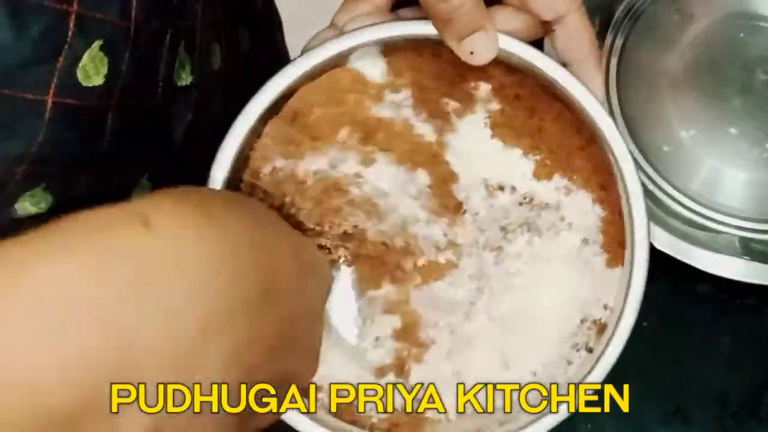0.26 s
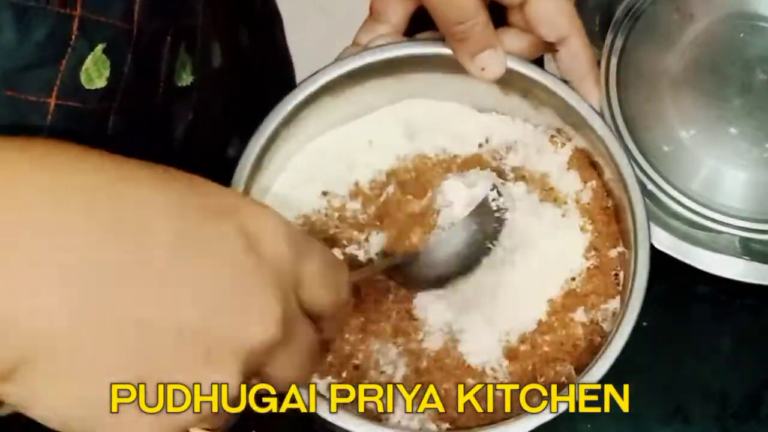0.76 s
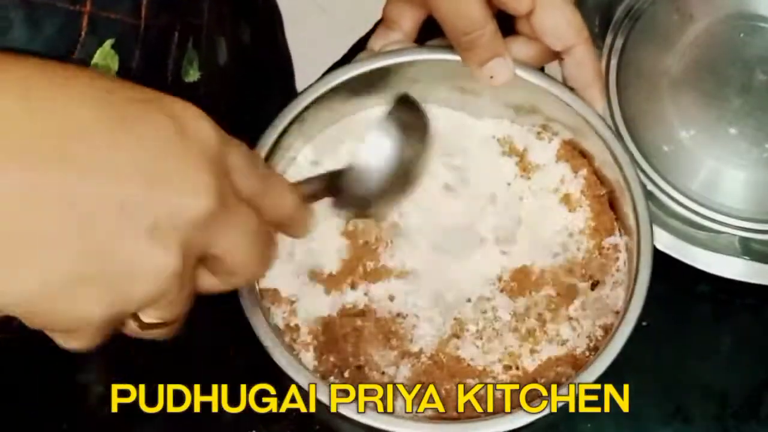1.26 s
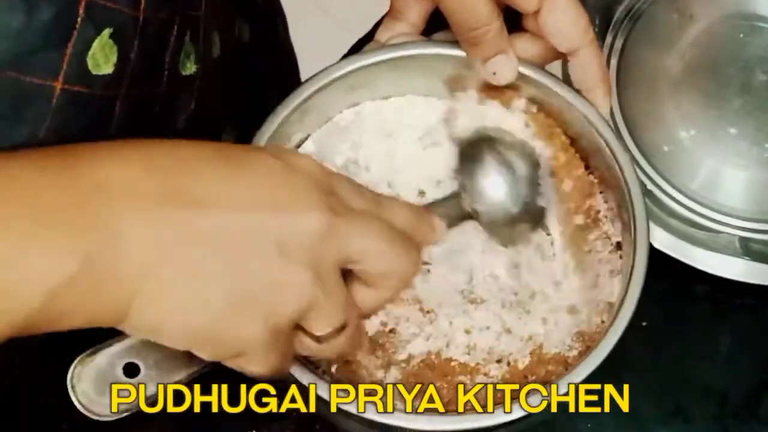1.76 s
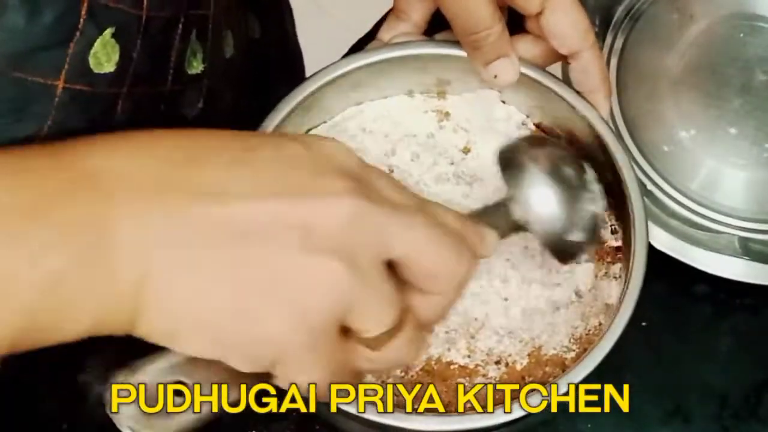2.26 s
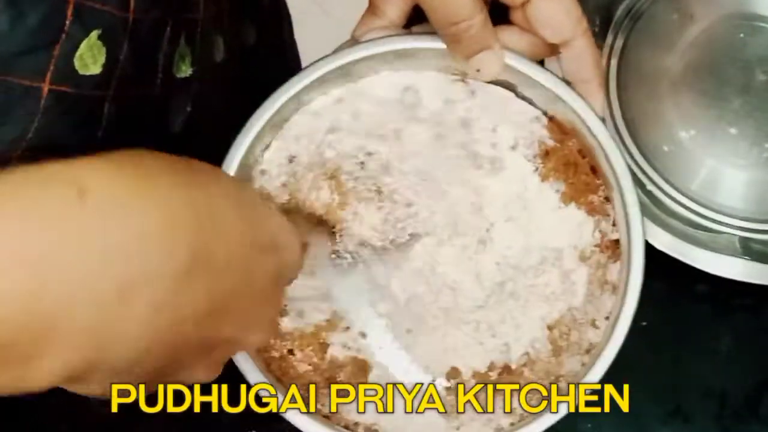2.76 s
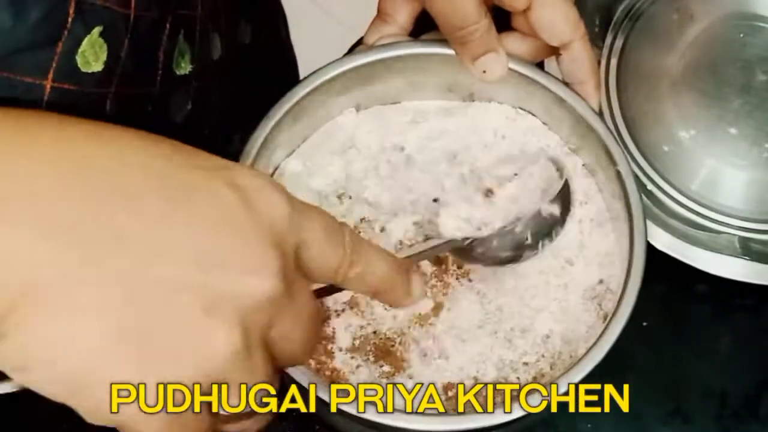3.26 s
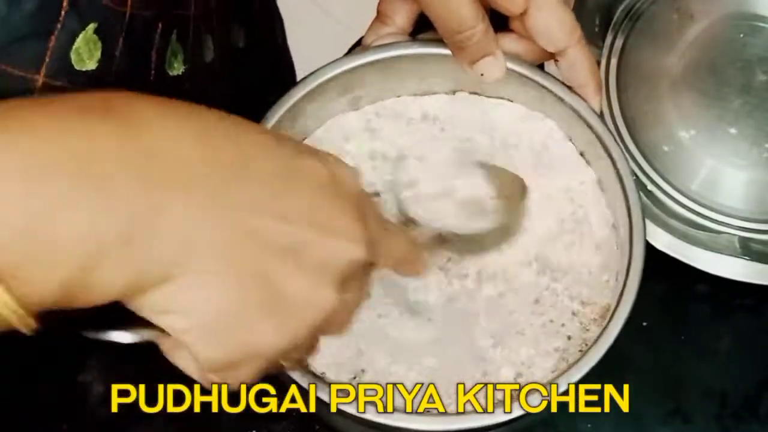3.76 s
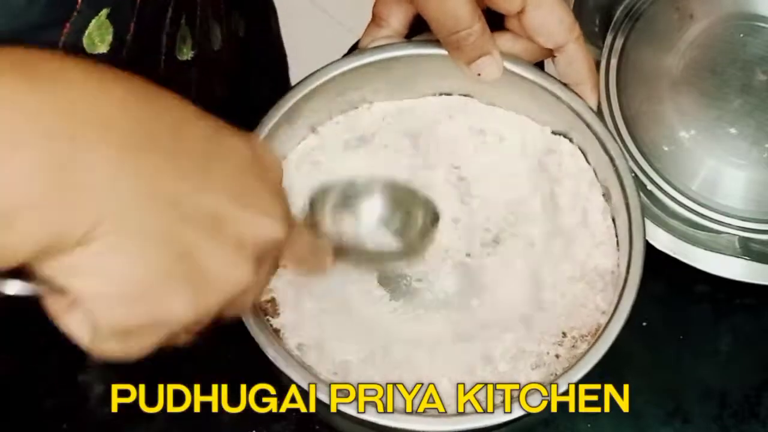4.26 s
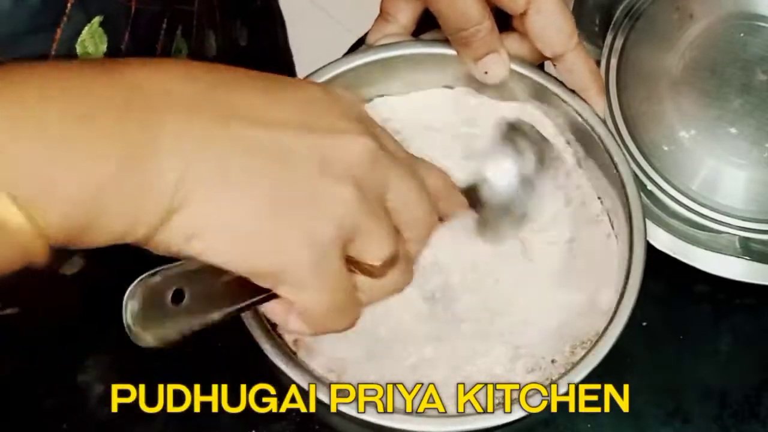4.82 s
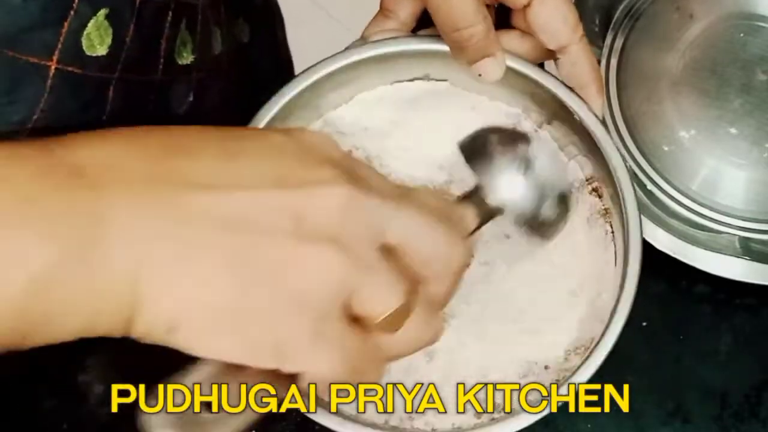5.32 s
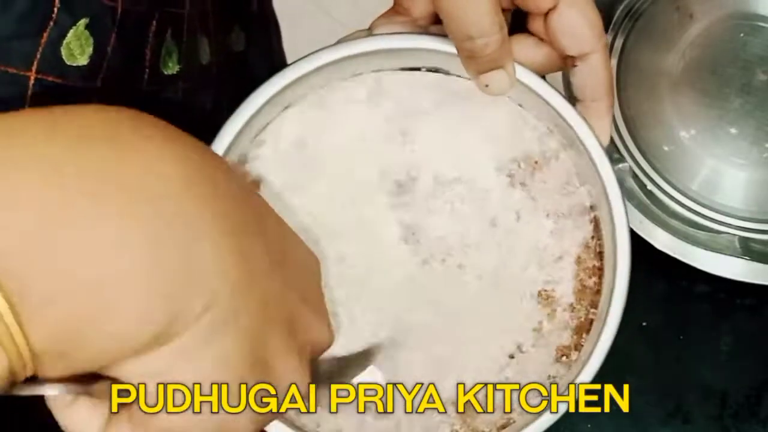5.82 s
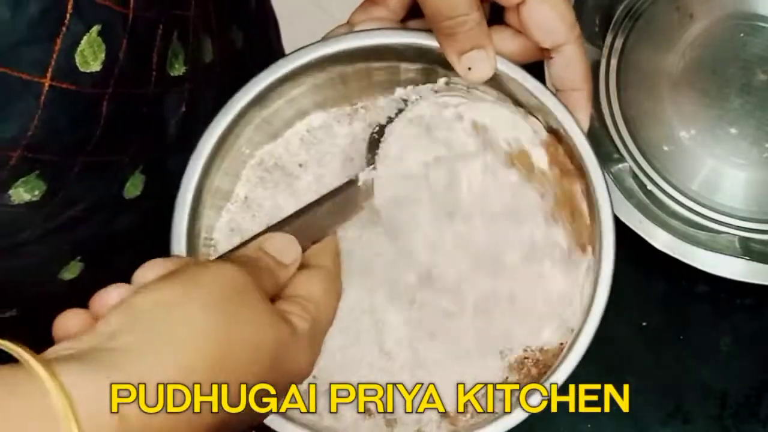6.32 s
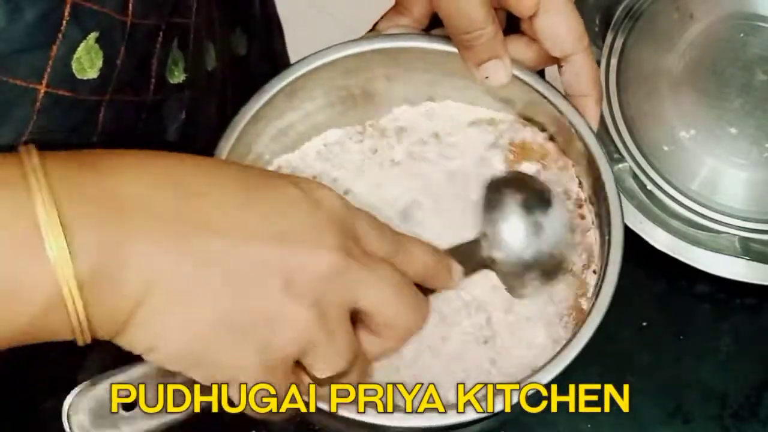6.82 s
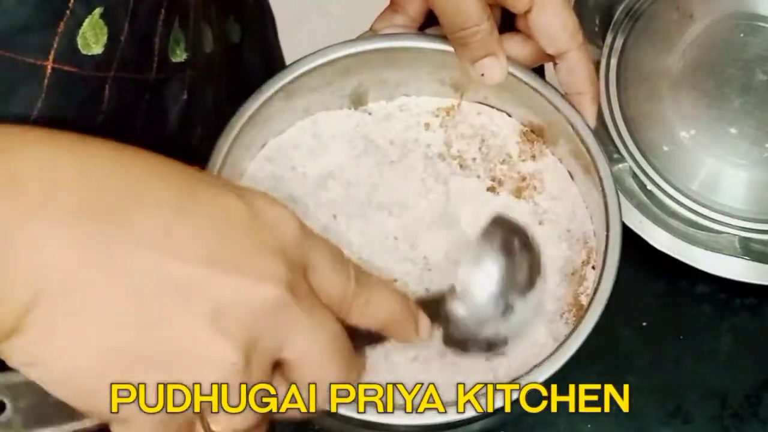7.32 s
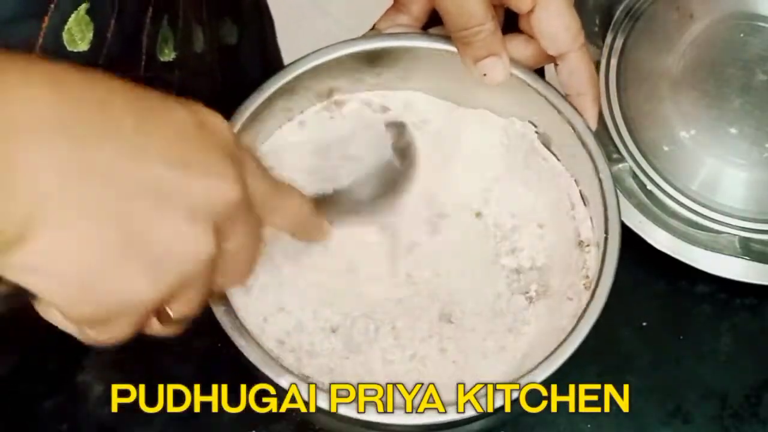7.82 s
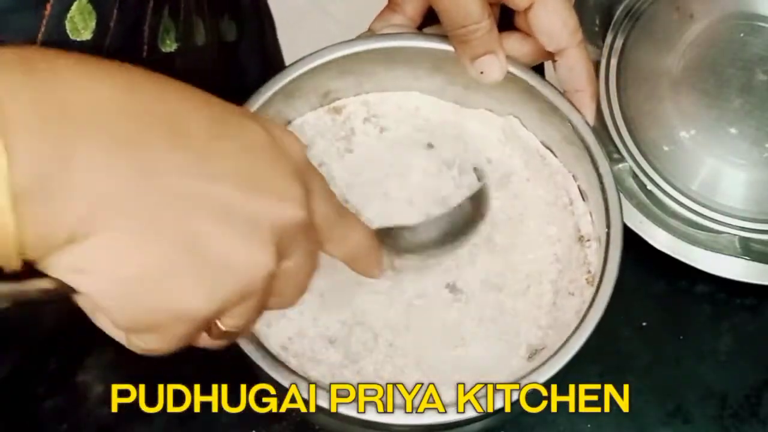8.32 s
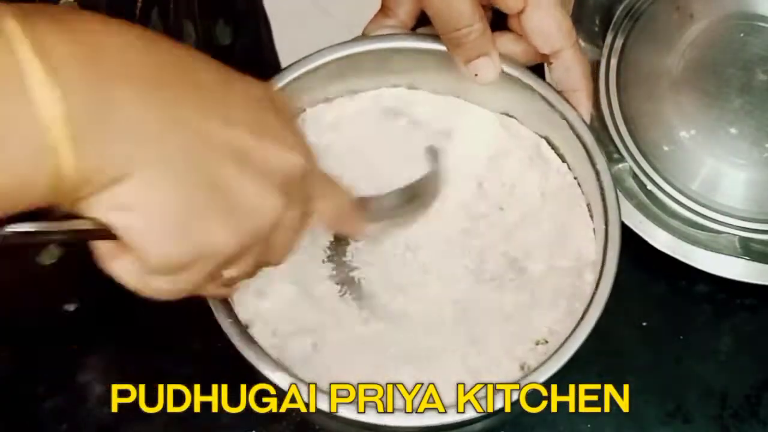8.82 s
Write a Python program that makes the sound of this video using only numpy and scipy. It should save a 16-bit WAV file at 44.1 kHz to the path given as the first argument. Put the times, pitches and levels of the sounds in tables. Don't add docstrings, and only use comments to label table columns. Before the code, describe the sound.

Close-up dry stirring in a steel pot: grainy scrapes, muffled taps, short bright knocks and dull counter thuds above a low motor hum.

```python
import sys
import numpy as np
from scipy import signal
from scipy.fft import rfft, irfft, next_fast_len
from scipy.io import wavfile
from scipy.ndimage import uniform_filter1d, map_coordinates

SR = 44100
rng = np.random.default_rng(int(sys.argv[2]) if len(sys.argv) > 2 else 0)


def persist_wave(psi):
    counts = np.round(np.clip(psi, -1, 1) * 32767).astype(np.int16)
    wavfile.write(sys.argv[1], SR, np.atleast_2d(counts).T)


def attenuation_scalar(level_db):
    decades = np.asarray(level_db, float) / 20
    return 10 ** decades


N = 400428

# f/Hz, level/dB, t60/s
STEEL_MODES = [(209, -6.5, 0.04), (433.6, -2, 0.087), (561.4, -6, 0.13), (754, -1.5, 0.057),
               (960, -7.5, 0.073), (1276, -16, 0.062), (1688, -13, 0.055), (2050, -2, 0.045),
               (2240, -8.5, 0.017), (2620, -11.5, 0.15), (2735, -8, 0.05), (3060, 2.5, 0.021),
               (3266, -3.5, 0.072), (3555, -10.5, 0.086), (4660, -12, 0.023), (4800, 1.5, 0.027),
               (5046, 1, 0.021), (5490, -8.5, 0.055), (6140, -13.5, 0.069), (6530, -5.5, 0.053),
               (6586, -1, 0.05), (6880, -16, 0.064), (7060, -6, 0.069)]
# f/Hz, density/dB per Hz
ROCK_SPECTRUM = [(120, -26), (200, 3), (450, 3.5), (750, 1), (1100, -18.5), (2000, -68.5)]


def unit(x):
    return x / np.sqrt(np.mean(x ** 2) + 1e-20)


def along(points, hz):
    f, v = np.transpose(points)
    return np.interp(np.log(hz + 1), np.log(f + 1), v)


def curve(points):
    s, v = np.transpose(points)
    return np.interp(np.arange(N) / SR, s, v)


def wobble(rate_hz):
    knots = rng.standard_normal(int(N * rate_hz / SR) + 4)
    return map_coordinates(knots, [np.arange(N) * rate_hz / SR])


def held(start_s, hold_s, level_db, rise_db_per_s, fall_db_per_s, rest_db):
    t = np.arange(0, N + 64, 64) / SR
    early_s = np.maximum(start_s[:, None] - t, 0)
    late_s = np.maximum(t - (start_s + hold_s)[:, None], 0)
    off_db = rise_db_per_s * early_s + fall_db_per_s * late_s
    power = np.sum(attenuation_scalar(level_db[:, None] - off_db) ** 2, axis=0)
    return np.sqrt(np.interp(np.arange(N) / SR, t, power) + attenuation_scalar(rest_db) ** 2)


def filtered(x, response):
    n = x.shape[-1]
    m = next_fast_len(n + 4096)
    return irfft(rfft(x, m) * response(np.fft.rfftfreq(m, 1 / SR)), m)[..., :n]


def spread(pair):
    # f/Hz, left-right correlation [-]
    likeness = [(60, 0.97), (130, 1), (290, 0.74), (640, 0.55), (1400, 0), (3100, 0.047), (6800, 0.84),
                (15000, 0.13)]

    def mid_side(hz):
        turn = np.arccos(np.clip(along(likeness, hz), -1, 1)) / 2
        return np.array([np.cos(turn), np.sin(turn)])

    mid, side = filtered(pair, mid_side)
    return np.array([mid + side, mid - side])


def rush(spectrum, patchy_db):
    z = signal.stft(rng.standard_normal((2, N)), nperseg=512)[2]
    field = uniform_filter1d(rng.standard_normal(z.shape[1:]), size=6, axis=0)
    field = uniform_filter1d(field, size=12, axis=1)
    pair = signal.istft(z * attenuation_scalar(patchy_db * unit(field)), nperseg=512)[1][:, :N]
    return unit(spread(filtered(pair, lambda hz: attenuation_scalar(along(spectrum, hz)))))


def kitchen(x, wet_db, lag_s):
    # f/Hz, t60/s
    wall_decay = [(200, 0.76), (530, 0.63), (1400, 0.63), (3700, 0.43), (9700, 0.41)]
    hz, t, z = signal.stft(rng.standard_normal((2, SR * 3 // 4)), SR, nperseg=256)
    decay = attenuation_scalar(-60 * t / along(wall_decay, hz)[:, None])
    tail = spread(signal.istft(z * decay, SR, nperseg=256)[1])
    tail_s = np.arange(tail.shape[1]) / SR
    tail *= 1 - np.exp(-tail_s / 0.0011)
    tail *= 1 + 1.03 * np.exp(-tail_s / 0.011)
    tail *= attenuation_scalar(wet_db) / np.linalg.norm(tail[1])
    tail[0, round(lag_s * SR)] += 1
    tail[1, 0] += 1
    return signal.fftconvolve(x[None], tail, axes=1)


def add_at(out, start_s, heard):
    out[:, round(start_s * SR):][:, :heard.shape[1]] += heard


def motor_hum():
    # f/Hz, density/dB per Hz
    hum_spectrum = [(44, -48), (75, -1.5), (102, 5), (113, 11.5), (127, 10), (145, -1.5), (178, -3.5),
                    (210, -6.5), (260, -24), (340, -42.5), (570, -120)]
    # t/s, level/dB
    steady = [(0, -48.5), (2.5, -48.5), (4.9, -52), (5.3, -55.5), (7.4, -53.5), (9.08, -50)]
    # start/s, length/s, level/dB
    surges = [(0.119, 0.38, -44.5), (0.59, 0.028, -48), (0.772, 0.042, -46.5), (0.913, 0.21, -43.5),
              (1.33, 0.097, -43.5), (1.665, 0.54, -43), (2.408, 0.13, -46), (2.61, 0.078, -45),
              (2.73, 0.12, -45.5), (2.958, 0.04, -46), (3.074, 0.04, -47), (3.29, 0.074, -49.5),
              (3.639, 0.032, -43), (3.768, 0.04, -47), (4.038, 0.094, -46.5), (4.387, 0.03, -45),
              (4.551, 0.063, -45), (4.775, 0.037, -49), (6.034, 0.067, -44), (6.49, 0.072, -44.5),
              (7.582, 0.083, -47), (7.825, 0.049, -43.5), (8.792, 0.041, -44), (9.019, 0.042, -46)]
    gain = held(*np.transpose(surges), rise_db_per_s=301, fall_db_per_s=250, rest_db=curve(steady))
    return attenuation_scalar(2.5) * gain * rush(hum_spectrum, patchy_db=1.5)


def lowest_hum():
    # t/s, level/dB
    deep_level = [(0.0, -63), (0.3, -53), (1.16, -65), (1.24, -83), (1.31, -59), (1.95, -63), (2.02, -78),
                  (2.25, -58), (3.24, -53), (3.51, -66), (4.27, -49.5), (7.16, -61.5), (7.23, -79),
                  (7.69, -58), (8.02, -68), (9.08, -65)]
    tone = np.sin(2 * np.pi * np.cumsum(64 + 1.5 * wobble(3)) / SR)
    tone = unit(tone * attenuation_scalar(1.5 * wobble(4)))
    rumble_spectrum = [(20, -1), (35, -3), (50, -14), (80, -13), (100, -30.5), (200, -120)]  # f/Hz, dB per Hz
    rumble = attenuation_scalar(-54 + 3 * wobble(1.56)) * rush(rumble_spectrum, patchy_db=0)
    return attenuation_scalar(curve(deep_level) + 3.5) * tone + rumble


def far_hiss():
    # f/Hz, density/dB per Hz
    hiss_spectrum = [(120, -26), (200, -21.5), (307, -2.5), (572, -18), (787, -6.5), (968, -11.5),
                     (1370, -5), (1800, -11), (1980, -8), (2480, 0.5), (2810, -24), (6440, -33),
                     (9000, -66), (11700, -78), (19800, -120)]
    # t/s, level/dB
    hiss_level = [(0, -35), (.4, -58), (1.15, -44), (1.9, -39), (2.3, -39), (2.5, -44.5), (2.95, -30),
                  (3.6, -63), (4.2, -35.5), (4.7, -43), (5.3, -63), (5.65, -37.5), (6.05, -39.5),
                  (6.5, -64), (7.45, -56), (7.95, -57), (8.3, -40), (9.08, -61)]
    # f/Hz, density/dB per Hz
    air_spectrum = [(100, 0.5), (2000, -4), (7000, -3), (8200, -46.5), (12000, -120)]
    hiss = attenuation_scalar(curve(hiss_level) - 10.5) * rush(hiss_spectrum, patchy_db=0.5)
    return hiss + attenuation_scalar(-68) * rush(air_spectrum, patchy_db=-2.0)


def scrape():
    # full pressure from t/s, held/s, scrape/dB, rocking/dB
    strokes = [(.17, 0.092, -62, -63), (.3, .04, -52.5, -54), (.38, 0.057, -43, -44),
               (0.681, 0.042, -43, -54), (0.962, 0.17, -46.5, -43.5), (1.3, 0.11, -49.5, -41),
               (1.47, .05, -49.5, -62), (1.631, 0.19, -42.5, -46), (1.83, 0.1, -37.5, -49),
               (2.02, 0.14, -49.5, -50), (2.36, 0.089, -59.5, -54), (2.56, 0.032, -58.5, -53),
               (2.768, .13, -42.5, -47), (2.97, .22, -45, -47), (3.25, 0.19, -42, -50),
               (3.5, 0.25, -45, -49.5), (3.962, 0.092, -36, -39.5), (4.08, 0.11, -42, -44.5),
               (4.55, 0.09, -46.5, -39), (4.85, .2, -45, -50), (5.15, 0.39, -49.5, -56.5),
               (6.17, 0.056, -37.5, -40), (6.46, 0.094, -42.5, -63), (6.829, 0.089, -44.5, -53),
               (7.202, 0.066, -43, -49.5), (7.501, 0.087, -50, -56), (7.84, 0.11, -42, -48),
               (8.01, .26, -46, -54), (8.33, 0.35, -46.5, -48.5), (8.7, 0.35, -47.5, -51.5)]
    # f/Hz, density/dB per Hz
    grit_spectrum = [(180, -8), (300, -8), (440, -31), (614, -6), (1170, 1), (2280, 7.5), (3700, -1.5),
                     (4910, -1.5), (5430, -2), (6620, 0.5), (8090, -16), (15000, -26.5), (16000, -11)]
    start_s, hold_s, scrape_db, rock_db = np.transpose(strokes)
    dig_db_per_s, lift_db_per_s = 238, 174
    press = held(start_s, hold_s, scrape_db, dig_db_per_s, lift_db_per_s, rest_db=-64.5)
    rock = held(start_s, hold_s, rock_db, dig_db_per_s, lift_db_per_s, rest_db=-71)

    ticks = (rng.random(N) < 1500 / SR) * rng.uniform(-1, 1, size=N)
    ticks *= attenuation_scalar(4 * np.minimum(rng.exponential(size=N), 3) + 3 * wobble(40))

    def steel(f):
        total = 0
        for k, (mode_hz, db, _) in enumerate(STEEL_MODES):
            loss = 1j * f * 90
            total = total + (-1) ** k * attenuation_scalar(db) * loss / (mode_hz * mode_hz - f * f + loss)
        return total

    grit = unit(filtered(ticks, lambda f: attenuation_scalar(along(grit_spectrum, f)) * (1 + 1.87 * steel(f))))
    near = attenuation_scalar(-2.5) * kitchen(press * grit, wet_db=-1.0, lag_s=0.00013)[:, :N]
    powder = press * attenuation_scalar(.1 + 1.5 * wobble(25)) * rush(grit_spectrum, patchy_db=1.5)
    rocking = rock * attenuation_scalar(2.5 * wobble(20)) * rush(ROCK_SPECTRUM, patchy_db=3)
    return near + powder + rocking


def knocks():
    # belly/dB, rim/dB
    touches = [(0.152, -30.5, -10.5, -13.5), (0.253, -32, -22, -33), (0.921, -43.5, -14, -10.5),
               (1.118, -35.5, -30, -2.5), (2.418, -27.5, -26, -45), (3.588, -25.5, -27, -28),
               (3.703, -32, -19.5, -15), (4.219, -32, -32, -17), (6.458, -25.5, -14.5, -5.5),
               (6.833, -21.5, -29.5, -19), (7.283, -26.5, -25, -36), (7.792, -34, -15, -15),
               (8.245, -25, -25, -25), (8.303, -26.5, -33, -23), (8.492, -32, -30, -18),
               (8.619, -25, -23, -25), (8.919, -25.5, -22.5, -23)]
    # belly/dB, rim/dB, walls/dB
    blows = [(0.385, -22.5, -16.5, -18, 3), (1.015, -18, -13, -13, 5), (1.284, -7, -13, -11.5, -1),
             (1.344, -17, -15, -2.5, 1.5), (1.608, -10, -21.5, -8, 7), (1.817, -8.5, -24.5, -21.5, 7),
             (2.927, -19, -25.5, -3, 3.5), (3.017, -11, -51, -27, 3), (3.054, -15, -30.5, -23, 3.5),
             (3.783, -16.5, -40, -36, 0.5), (3.943, -4, -23.5, -19.5, 7.5), (4.441, -6.5, -15.5, -9, 2.5),
             (4.725, -11.5, -9.5, -8, 4), (5.127, -29, -44, -4.5, -2), (6.029, -4.5, -22.5, -28, 6),
             (6.158, -10.5, -11.5, -7.5, -1), (7.533, -19.5, -19, -24.5, 4.5), (7.889, -22, -38, -16, -1)]
    zone_hz = [600, 2100, 4200, 6600, 8500]
    # f/Hz, density/dB per Hz
    crack_spectrum = [(88, -28), (150, -24), (303, -15.5), (545, 16), (979, 1), (1360, 1), (2650, 6.5),
                      (3420, -0.5), (4950, -4), (6140, -7.5), (6640, 9), (7620, -28.5), (16000, -69.5)]
    out, t = np.zeros((2, N + 2 * SR)), np.arange(SR // 5) / SR
    hz, mode_db, t60_s = np.transpose(STEEL_MODES)[:, :, None]
    touch_walls_db = 8
    for s, peak_db, belly_db, rim_db, wet_db in [*blows, *((*touch, touch_walls_db) for touch in touches)]:
        spoon_db = -7 + 0.66 * rim_db
        zones = list(zip(zone_hz, [belly_db, -14, rim_db, spoon_db, -15]))
        luck_db = 4.3 * rng.standard_normal(hz.shape)
        size = attenuation_scalar(mode_db + along(zones, hz) + luck_db - 60 * t / t60_s)
        detuned_hz = hz * (1 + 0.0028 * rng.standard_normal(hz.shape))
        ring = np.sum(size * np.sin(2 * np.pi * detuned_hz * t), axis=0)
        burst = attenuation_scalar(-60 * t / 0.012) * rng.standard_normal(len(t))
        burst /= np.linalg.norm(burst)
        crack = filtered(burst, lambda f: attenuation_scalar(along(crack_spectrum, f) + along(zones, f)))
        blow = attenuation_scalar(peak_db - 3.5) * (ring + attenuation_scalar(34.5) * crack)
        add_at(out, s + .0012, kitchen(blow, wet_db, lag_s=.00017))
    return out[:, :N]


def bumps():
    # t/s, peak/dB, f/Hz
    thuds = [(0.153, -27.5, 222), (0.271, -32.5, 215), (0.96, -29, 222), (1.494, -33, 503),
             (2.421, -35.5, 366), (2.602, -29, 540), (4.584, -26, 303), (5.091, -44.5, 754),
             (5.94, -38.5, 257), (6.849, -32.5, 540), (7.237, -37, 740), (7.514, -30.5, 222),
             (7.574, -27, 256), (7.798, -34, 378), (8.305, -26, 523), (8.495, -30.5, 243),
             (8.659, -30, 227), (8.779, -42, 237), (8.82, -36, 311), (9.0, -29.5, 209)]
    out, t = np.zeros((2, N + 2 * SR)), np.arange(SR // 8) / SR
    partials = [(.62, 0.5), (1, 4), (1.45, -12)]
    for s, peak_db, hz in thuds:
        ring = sum(attenuation_scalar(db) * np.sin(2 * np.pi * k * hz * t) for k, db in partials)
        puff = unit(filtered(rng.standard_normal(len(t)), lambda f: attenuation_scalar(along(ROCK_SPECTRUM, f))))
        thud = attenuation_scalar(peak_db - 6.5 - 60 * t / 0.066) * (ring + 0.78 * puff)
        add_at(out, s, kitchen(thud, wet_db=2.0, lag_s=0.00029))
    return out[:, :N]


def ringing_modes():
    # t/s, peak/dB, f/Hz, t60/s
    modes = [(.386, -23, 1300, 0.028), (1.016, -25.5, 578, 0.084), (1.286, -18, 409.6, 0.091),
             (1.344, -15.5, 4270, 0.037), (1.606, -16.5, 2735, 0.069), (1.607, -17, 3200, 0.042),
             (1.817, -17, 1489, 0.059), (1.818, -21, 3330, 0.07), (2.928, -28, 4920, 0.043),
             (3.944, -20, 2080, 0.19), (3.943, -16.5, 2600, 0.093), (3.946, -24, 990, 0.15),
             (4.442, -17.5, 958, 0.08), (4.441, -30, 2620, 0.036), (4.725, -19.5, 960, 0.08),
             (4.727, -18.5, 2500, 0.047), (5.129, -20.5, 5030, 0.0066), (5.128, -27.5, 3090, 0.044),
             (6.032, -25, 956, 0.078), (6.03, -15.5, 1800, 0.044), (6.85, -32, 613, 0.049),
             (7.08, -30, 2940, 0.0062), (8.919, -29.5, 2430, 0.063)]
    out, t = np.zeros((2, N + 2 * SR)), np.arange(SR // 5) / SR
    for s, peak_db, hz, t60_s in modes:
        ring = attenuation_scalar(peak_db - 60 * t / t60_s) * np.sin(2 * np.pi * hz * t)
        add_at(out, s, kitchen(ring, wet_db=-0.5, lag_s=0.00015))
    return out[:, :N]


def scene():
    room = motor_hum() + lowest_hum() + far_hiss()
    struck = knocks() + bumps() + ringing_modes()
    vessel = filtered(struck, lambda hz: 1 / (1 + (170 / (hz + 1)) ** 6))
    return room + scrape() + vessel


def sparse_top(x, edge_hz, under_db, least_db, jump_db):
    hz, _, z = signal.stft(x, SR, nperseg=2048)
    power = np.mean(np.abs(z) ** 2, axis=0) + 1e-20
    patch = np.abs(uniform_filter1d(power, size=5, axis=0)) ** .5
    around = np.exp(uniform_filter1d(np.log(power), size=61, axis=0) / 2)
    treble = np.sqrt(power[hz > edge_hz].sum(axis=0))
    attack = treble > attenuation_scalar(jump_db) * np.roll(treble, 1)
    stands_out = patch > np.maximum(attenuation_scalar(under_db) * around, attenuation_scalar(least_db))
    keep = (hz[:, None] < edge_hz) | attack | stands_out
    return signal.istft(z * keep, SR, nperseg=2048)[1][:, :N]


def low_pass(x):
    return signal.sosfilt(signal.butter(12, 16640, fs=SR, output="sos"), x)


def record(dry):
    # f/Hz, left minus right/dB
    port_lean = [(60, 2.5), (110, -1), (200, 1), (380, -2), (700, -1.5), (1290, -2), (2380, -3),
                 (4400, -12.5), (8120, -1.5), (15000, 4)]
    halves = np.array([[.5], [-.5]])
    x = filtered(dry, lambda hz: attenuation_scalar(along(port_lean, hz) * halves) / (1 + (56 / (hz + 1)) ** 3))
    x = x / (1 + np.abs(x / .98) ** 6) ** (1 / 6)
    x = sparse_top(x, edge_hz=7500, under_db=1.6, least_db=-97.5, jump_db=8)
    x = filtered(x, lambda hz: hz < 15750)
    return low_pass(x)


dry = scene()
out = record(dry)
persist_wave(out)
```